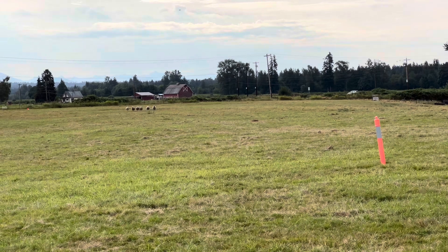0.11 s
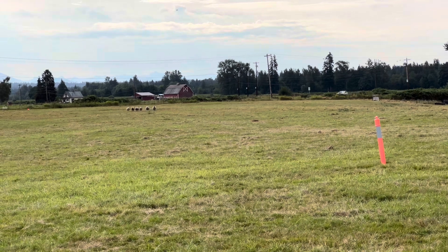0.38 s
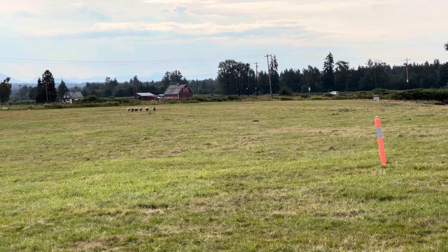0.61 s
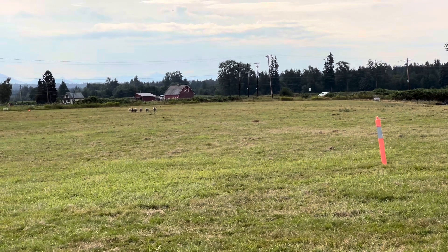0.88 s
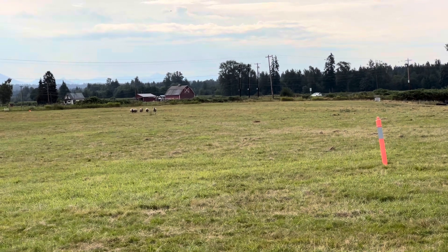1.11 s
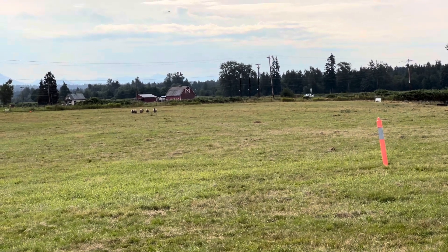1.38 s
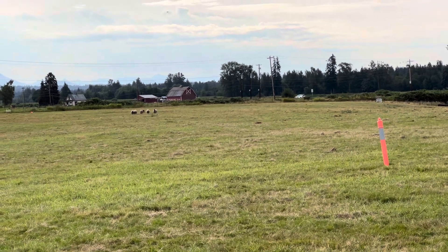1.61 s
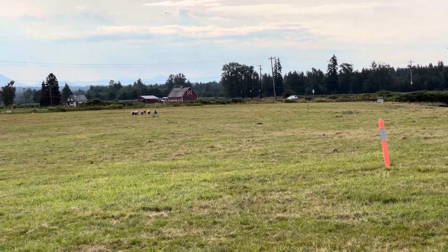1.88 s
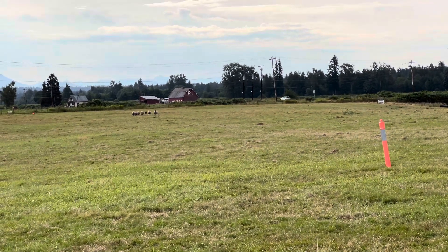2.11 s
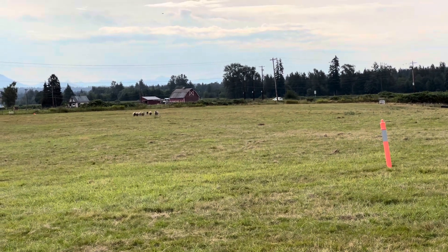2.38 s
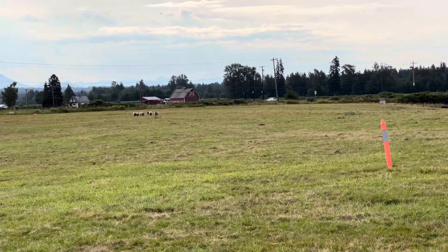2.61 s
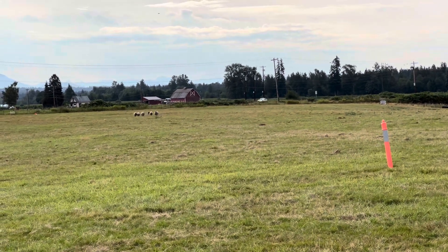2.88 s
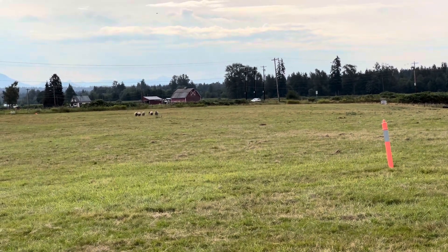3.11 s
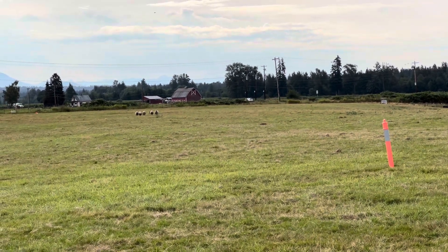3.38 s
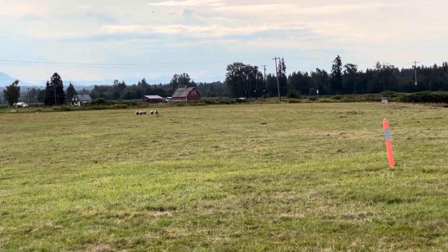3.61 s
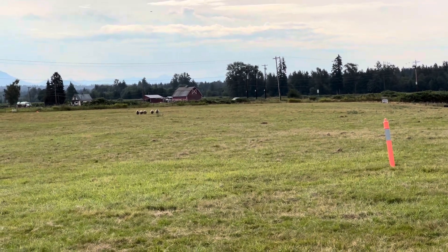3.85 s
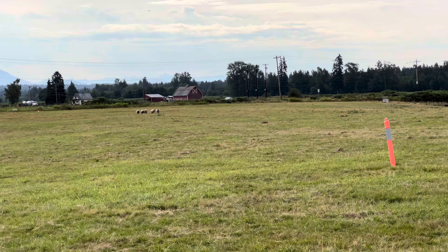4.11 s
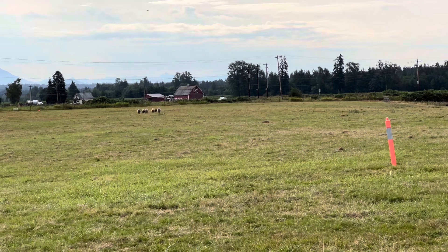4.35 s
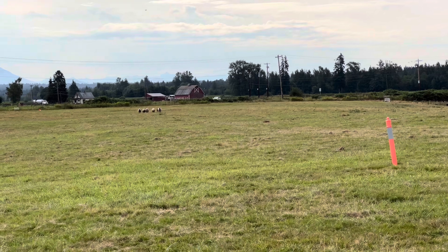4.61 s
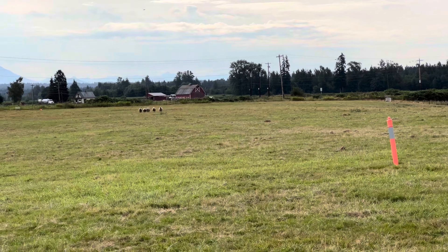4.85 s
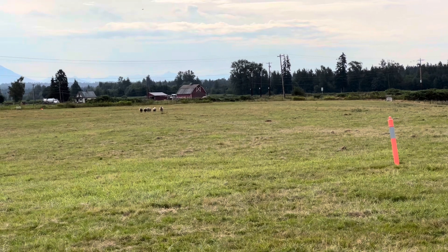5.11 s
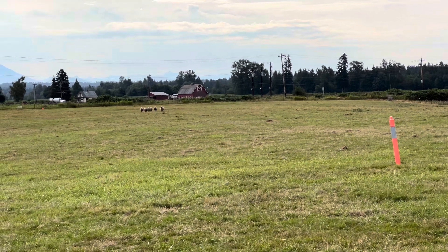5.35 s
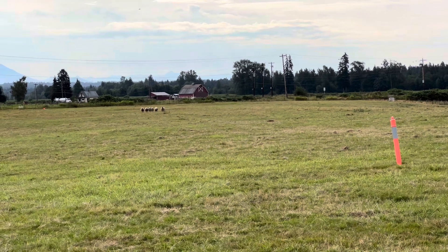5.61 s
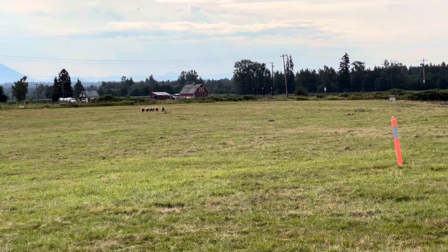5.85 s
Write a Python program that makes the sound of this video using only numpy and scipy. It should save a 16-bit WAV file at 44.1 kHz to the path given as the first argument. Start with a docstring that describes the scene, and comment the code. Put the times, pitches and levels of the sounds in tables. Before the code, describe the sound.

Quiet open grass field with a constant low rumble of far traffic and wavering engine hum. Soft, patchy tyre wash brightens slightly later on. Small distant birds give brief high chips, slides and tiny trills from the start. Two dull, quick knocks come just before three seconds. Wide stereo outdoor pickup, no close sources, faint microphone hiss.

```python
"""Far traffic over an open grass field: band-shaped noise makes a low rumble and a soft, patchy tyre wash.
Idling engines add a few wavering sine hum lines, and short rings make two dull knocks.
Small birds chirp far off as sines on pitch tracks, with a dull scattered echo and a flock heard only as echo.
The microphone pair hisses faintly."""
import sys
import numpy as np
from scipy import signal
from scipy.fft import rfft, irfft
from scipy.io import wavfile
from scipy.ndimage import uniform_filter1d, map_coordinates

SR = 44100
rng = np.random.default_rng(int(sys.argv[2]) if len(sys.argv) > 2 else 0)


def wav_out(sig):
    """Save sig, one row per channel (or a flat mono array), as 16-bit PCM at SR to the path in sys.argv[1]."""
    wavfile.write(sys.argv[1], SR, np.round(np.clip(np.atleast_2d(sig).T, -1, 1) * 32767).astype(np.int16))


def gain_from_db(level_db):
    """Turn a decibel level (scalar or array-like) into a linear amplitude factor."""
    decades = np.asarray(level_db, float) / 20
    return 10 ** decades


N = 263718
FREQS = np.maximum(np.fft.rfftfreq(N, 1 / SR), 1)


def in_time(rows):
    """Draws the columns of a table out to every sample."""
    s, *columns = np.transpose(rows)
    return [np.interp(np.arange(N) / SR, s, c) for c in columns]


def in_pitch(rows):
    """Draws the columns of a table out over log frequency."""
    hz, *columns = np.transpose(rows)
    return [np.interp(np.log(FREQS), np.log(hz), c) for c in columns]


def drift(rate):
    """Smooth chance that wanders through the given number of random knots per s, spread near 1."""
    knots = rng.standard_normal(int(N / SR * 500))
    return map_coordinates(knots, [np.arange(N) / SR * min(rate, 490)], order=3)


def to_pair(near, far):
    """Spectra for both microphones: the right one hears a turned share of the left plus sound of its own."""
    # the microphone pair: [f/Hz, left-right likeness 0-1, right leads/rad, left minus right/dB]
    pair = [(60, .995, 0, 2.0), (130, .97, .05, 2.5), (260, .9, .2, 2.7), (430, .76, .4, 2.9),
            (700, .46, -.1, 2.6), (1050, .5, .15, 1.7), (1450, .62, 1.15, .6), (1950, .72, .6, -.1),
            (2130, .95, .1, -.7), (2550, .97, -.15, -.8), (3300, .95, -.7, -.6), (5000, .97, -.12, 0),
            (7300, .97, 0, 0), (7900, .88, -.45, 0), (8500, .95, 0, 0), (9300, .8, 1.9, 0),
            (10300, .87, 3.1, 0), (11300, .65, 6.2, 0)]
    alike, turn, balance_db = in_pitch(pair)
    alike = np.clip(alike, 0, 1)
    right = alike * near + np.sqrt(1 - alike ** 2) * far
    right = right * np.exp(1j * turn)
    return np.array([near * gain_from_db(balance_db / 2), right * gain_from_db(-balance_db / 2)])


def field_noise(spectrum):
    """Spectra of noise arriving from all around, shaped within the table's band, rms 1 in the left-right mean."""
    inside = (FREQS > spectrum[0][0]) & (FREQS < spectrum[-1][0])
    both = to_pair(*rfft(rng.standard_normal((2, N))))
    both = both * gain_from_db(in_pitch(spectrum)[0]) * inside
    return both / np.std(irfft(both.mean(axis=0), N))


def rumble():
    """Low traffic noise from all around, thinning very slowly."""
    # relative spectrum of the rumble: [f/Hz, level/dB per Hz]
    rumble_spectrum = [(8.8, -42.5), (15, -18.5), (49, -2.5), (70, 0), (114, -8), (135, -10), (193, -24.5),
                       (260, -22.5), (340, -53.5), (570, -120)]
    start_db, slope_db_per_s = -50.5, -0.04
    t = np.arange(N) / SR
    return gain_from_db(start_db + slope_db_per_s * t) * irfft(field_noise(rumble_spectrum), N)


def tyre_wash():
    """Tyre noise in two bands: nearer cars brighten the top, moving air makes both bands patchy."""
    # relative spectrum of the wash before the bands move: [f/Hz, level/dB per Hz]
    wash_spectrum = [(100, -24), (170, -3.5), (210, -9.5), (475, -9.5), (685, -13), (905, -13.5),
                     (1300, -20), (1860, -24), (2300, -30.5), (2700, -35.5), (3200, -43.5), (4200, -47.5),
                     (6000, -59.5)]
    # top of the wash, rising as a car draws nearer, with a brief lift near the knocks: [t/s, level/dB]
    nearing = [(0, -3.5), (.9, -0.5), (1.6, -2), (2.72, -2), (2.85, 2.5), (3.05, 0), (3.6, 0.5), (4.4, 1),
               (5.2, 1), (5.98, 2.5)]
    wash_db = -59.5
    wash = field_noise(wash_spectrum)
    top = 1 / (1 + (1400 / FREQS) ** 4)  # share of the wash above about 1400 Hz
    body = gain_from_db(0.52 * drift(5)) * irfft(wash * (1 - top), N)
    sizzle = gain_from_db(in_time(nearing)[0] + 1.0 * drift(9)) * irfft(wash * top, N)
    return gain_from_db(wash_db) * (body + sizzle)


def engines():
    """Each engine hum line is a sine that wavers a little in pitch and strength on its long path."""
    # hum lines before wavering and panning, each loudest at one moment:
    # [f/Hz, loudest level/dB rms, t/s of the loudest moment, loss/dB per s away from it]
    hum_lines = [(42.8, -58, 6.3, 1), (64.1, -48, 4.72, 2), (77.7, -52.5, 1, 1.5), (89, -59, 6.1, 0.15),
                 (111.36, -58, 4.5, 0.7)]
    pan_db = 2.0  # left minus right
    out, t = np.zeros(N), np.arange(N) / SR
    for hz, peak_db, at, loss_db in hum_lines:
        track_hz = hz + .3 * drift(1.49)
        phase = 2 * np.pi * np.cumsum(track_hz) / SR + rng.uniform(0, 2 * np.pi)
        level_db = peak_db - loss_db * np.abs(t - at) + 1.5 * drift(2.3)
        out += np.sqrt(2) * gain_from_db(level_db) * np.sin(phase)  # root 2: rms to peak
    return out * gain_from_db(np.array([[.5], [-.5]]) * pan_db)


def add_tone(out, start, hz, height):
    """Adds one sine that follows a pitch track."""
    at = round(start * SR)
    out[at:at + len(hz)] += height * np.sin(2 * np.pi * np.cumsum(hz) / SR)


def knocks():
    """Each dull far knock sets a few short, wide, decaying rings going."""
    # rings of one knock: [f/Hz, width/Hz, level/dB]
    knock_modes = [(1520, 170, 0), (2000, 300, -8), (2550, 400, -13)]
    # the knocks: [t/s, level/dB]
    knock_times = [(2.781, -51), (2.862, -46.5)]
    out, t = np.zeros(N), np.arange(round(.02 * SR)) / SR
    for start, knock_db in knock_times:
        for hz, width_hz, mode_db in knock_modes:
            ring = np.exp(-np.pi * width_hz * t) * np.minimum(t / 0.0006, 1)  # 0.6 ms onset
            add_tone(out, start, np.full(len(t), hz), gain_from_db(knock_db + mode_db) * ring)
    return out


def near_birds(waver_hz):
    """All directly heard bird voices; moving air makes far tones flutter in level."""
    voices = whistles(notes(), waver_hz) + chips(waver_hz) + trills(waver_hz) + warble(waver_hz)
    flutter_db = 1.5 * drift(150) + 1.1 * drift(60)
    return voices * gain_from_db(flutter_db)


def notes():
    """Glides, arches and scoops as rows of start, length, first, middle and last pitch, and level."""
    # straight glides: [start t/s, length/s, first f/Hz, last f/Hz, level/dB]
    glide_rows = [(0.042, 0.023, 3900, 4300, -84), (0.075, .009, 4150, 4100, -83),
                  (.05, .014, 8800, 8100, -85), (.07, .02, 8150, 7900, -89), (3.29, .013, 6340, 6300, -84),
                  (0.427, 0.055, 3960, 3500, -82), (.622, .014, 5500, 5100, -85),
                  (0.636, .045, 4140, 3800, -87), (0.658, 0.063, 8450, 8650, -88.5),
                  (0.865, 0.041, 5820, 5620, -75.5), (0.887, 0.0071, 4250, 4200, -77),
                  (0.923, 0.17, 7230, 7120, -88.5), (1.04, .16, 7550, 8000, -89),
                  (1.2, 0.041, 8000, 7500, -87), (1.762, .02, 3570, 3250, -82),
                  (2.17, .063, 4530, 3900, -89), (2.414, .014, 4350, 4440, -82),
                  (2.824, 0.019, 4650, 4350, -78), (0.17, 0.02, 4050, 3850, -88),
                  (1.925, .012, 7750, 7600, -88), (3.15, .047, 6800, 6350, -90),
                  (1.955, .02, 7400, 8100, -88), (1.986, .015, 8700, 8000, -88),
                  (2.014, .012, 7950, 7600, -86), (2.036, .014, 8200, 7600, -86),
                  (2.06, 0.028, 8650, 7600, -86), (2.09, .015, 7950, 7600, -87),
                  (2.116, .015, 8300, 7850, -88), (2.137, .016, 8300, 7750, -87),
                  (2.161, .015, 8150, 7200, -85), (3.02, .05, 4450, 4050, -91),
                  (2.88, 0.028, 6500, 6600, -84), (3.078, .02, 7250, 7320, -86),
                  (3.997, 0.021, 4100, 3520, -83), (4.016, 0.034, 8300, 6800, -85),
                  (4.02, .03, 6000, 5650, -89), (4.628, .028, 4150, 4050, -88),
                  (4.66, 0.025, 4050, 3700, -83), (4.907, 0.013, 5530, 5100, -81.5),
                  (5.138, 0.071, 4470, 3900, -83.5), (5.32, 0.014, 3780, 3360, -79),
                  (1.26, .035, 3900, 3550, -87), (5.6, .15, 4500, 3650, -92),
                  (2.893, .024, 5800, 5800, -90)]
    # arched notes: [start t/s, length/s, first and last f/Hz, crest f/Hz, level/dB]
    arch_rows = [(5.051, .062, 5900, 6120, -82), (2.672, .034, 3900, 3650, -86)]
    # scooped notes: [start t/s, length/s, middle f/Hz, last f/Hz, level/dB]
    scoop_rows = [(0.042, 0.094, 7120, 7300, -87), (0.867, .042, 6120, 6400, -78.5),
                  (1.648, 0.091, 7370, 8900, -83.5), (1.652, .062, 8000, 8500, -89),
                  (2.824, 0.0306, 3270, 3550, -75)]
    scoop_start = 0.08  # scoops start this share above their middle pitch
    glides = [(s, length, first, (first + last) / 2, last, db) for s, length, first, last, db in glide_rows]
    arches = [(s, length, end, crest, end, db) for s, length, end, crest, db in arch_rows]
    scoops = [(s, length, low * (1 + scoop_start), low, last, db) for s, length, low, last, db in scoop_rows]
    return glides + arches + scoops


def whistles(rows, waver_hz):
    """Each note is a sine that bends smoothly through three pitches under a rounded swell."""
    out = np.zeros(N)
    for start, length, first_hz, middle_hz, last_hz, level_db in rows:
        u = np.linspace(0, 1, round(length * SR))
        bend_hz = middle_hz - (first_hz + last_hz) / 2
        hz = first_hz + (last_hz - first_hz) * u + 4 * u * (1 - u) * bend_hz
        hz = hz + waver_hz[round(start * SR):][:len(u)]
        add_tone(out, start, hz, gain_from_db(level_db) * np.sin(np.pi * u) ** .35)
    return out


def chips(waver_hz):
    """Every chip follows the same rounded pitch zigzag, stressed on a different part."""
    # zigzag of one chip, down, up, down: [share of length, f/Hz]
    chip_pitch = [(0, 4050), (.23, 3170), (.58, 4450), (1, 2950)]
    # chips: [start t/s, length/s, share of the full pitch swing,
    #         level/dB at the dip, on the rise, at the crest, on the last fall]
    chip_rows = [(0.682, 0.029, 1.0, -82, -74, -74, -71), (2.809, 0.026, 1.0, -74, -75.5, -79, -95),
                 (3.786, 0.023, 1.07, -66, -69.5, -83, -75), (4.69, 0.029, .55, -67, -68, -82, -72)]
    middle_hz, onset_db = 3720, -6  # the first fall starts 6 dB under the dip
    out, (share, pitch_hz) = np.zeros(N), np.transpose(chip_pitch)
    for start, length, swing, *levels_db in chip_rows:
        u = np.linspace(0, 1, round(length * SR))
        hz = np.interp(u, share, middle_hz + swing * (pitch_hz - middle_hz))
        hz = uniform_filter1d(hz, len(u) // 10, mode="nearest")  # rounds the corners
        hz = hz + waver_hz[round(start * SR):][:len(u)]
        stress_at = [0, share[1], .42, share[2], .82]
        level_db = np.interp(u, stress_at, [levels_db[0] + onset_db, *levels_db])
        add_tone(out, start, hz, gain_from_db(level_db) * np.sin(np.pi * u) ** 0.13)
    return out


def trills(waver_hz):
    """Slightly uneven beats, each dropping in pitch, under a swell."""
    # trills: [start t/s, length/s, f/Hz, drop per beat/Hz, beats per s, lift at the middle/Hz, level/dB]
    trill_rows = [(0.092, 0.083, 8350, 900, 60, 0, -85), (0.096, .06, 4330, 400, 53, 0, -78.5),
                  (5.136, 0.069, 5200, 1100, 131, 330, -72.5), (5.152, 0.075, 3800, 700, 120, 0, -84)]
    spread_db, spread_hz = 1.5, 90  # beats differ in strength and pitch
    out = np.zeros(N)
    for start, length, centre_hz, drop_hz, per_s, lift_hz, level_db in trill_rows:
        u = np.linspace(0, 1, round(length * SR))
        beats = np.cumsum(1 + .03 * drift(66)[:len(u)]) * per_s / SR
        beat = beats % 1  # place within the beat
        louder, higher = rng.standard_normal((2, 40))[:, beats.astype(int)]
        lift = np.exp(-((u - .5) / .22) ** 2)
        hz = centre_hz + lift_hz * lift + spread_hz * higher
        hz = hz + waver_hz[:len(u)] + drop_hz * (.5 - beat)
        swell = np.sin(np.pi * u) ** .6 * np.sin(np.pi * beat) ** 2.8
        add_tone(out, start, hz, gain_from_db(level_db + spread_db * louder) * swell)
    return out


def warble(waver_hz):
    """A held note whose pitch swings evenly up and down, loudest at each dip."""
    # the note: [start t/s, length/s, f/Hz, swing/Hz, dips per s, loss between dips/dB, level/dB]
    warble_note = (3.197, .091, 6160, 120, 66, 6, -76)
    start, length, centre_hz, swing_hz, per_s, loss_db, peak_db = warble_note
    out = np.zeros(N)
    u = np.linspace(0, 1, round(length * SR))
    high = np.cos(2 * np.pi * per_s * length * u)
    hz = centre_hz + swing_hz * high + .5 * waver_hz[:len(u)]
    level_db = peak_db - loss_db * (1 + high) / 2
    add_tone(out, start, hz, gain_from_db(level_db) * np.sin(np.pi * u) ** .3)
    return out


def far_flock():
    """Random short falling chirps, as note rows for whistles()."""
    # flock farther off: [calls per s, lowest f/Hz, highest f/Hz of mid-call pitch, lowest level/dB]
    flock_calls = (26, 2700, 4000, -91.5)
    per_s, low_hz, high_hz, level_db = flock_calls
    chance = rng.random((200, 5))
    start = np.cumsum(-np.log(1 - chance[:, 0])) / per_s  # random gaps
    length = .015 + .05 * chance[:, 2]
    hz = low_hz + (high_hz - low_hz) * chance[:, 1] ** 1.7  # favours low calls
    first_hz = hz * (1 + .15 * chance[:, 3])
    rows = np.c_[start, length, first_hz, hz, hz * .94, level_db + 6 * chance[:, 4]]
    return list(rows[start < N / SR - .1])


def scattered(x):
    """Grass and trees return a short dull blur from all round, modelled as decaying noise."""
    t = np.arange(round(.3 * SR)) / SR
    decay = gain_from_db(-20 * t / .08)  # 20 dB down every 80 ms
    scatter = rng.standard_normal((2, len(t))) * decay * np.minimum(t / .02, 1)  # builds up over 20 ms
    scatter = scatter / np.linalg.norm(scatter[0])
    blur = rfft(signal.fftconvolve([x], scatter, axes=1)[:, :N])
    return to_pair(*blur / (1 + (FREQS / 5500) ** 4))  # dull above 5500 Hz


def hiss():
    """Spectra of the microphone pair's faint hiss: steady shaped noise."""
    # relative spectrum of the hiss: [f/Hz, level/dB per Hz]
    hiss_spectrum = [(2000, -16.5), (3500, -13), (5000, 0.5), (7500, 2), (8500, -0.5), (9500, -2),
                     (10400, -9), (11000, -11.5), (12200, -12.5), (12700, -33.5)]
    return gain_from_db(-90.5) * field_noise(hiss_spectrum)


def scene():
    """Engines, near birds and knocks are direct sources; echoes, road and hiss come from all round."""
    waver_hz = 60.0 * drift(220)  # unsteady voices
    near = near_birds(waver_hz) + knocks()
    flock = whistles(far_flock(), 4.0 * waver_hz)  # heard only as scattered sound
    lag_s = np.array([[0], [7e-6]])  # later on the right
    direct = to_pair(rfft(near), 0) * np.exp(-2j * np.pi * FREQS * lag_s)
    echoes = scattered(gain_from_db(-4) * near + flock)
    return rumble() + tyre_wash() + engines() + irfft(direct + echoes + hiss(), N)


def band_limit(x):
    """A steep low-pass at the top of the band."""
    return signal.sosfilt(signal.butter(12, 12500, fs=SR, output="sos"), x)


def record(dry):
    """Softens both ends over 2 ms so that they do not click, and finishes the mix."""
    n = np.arange(N)
    fade = np.minimum(np.minimum(n, N - 1 - n) / (.002 * SR), 1)
    mix = dry * fade
    return band_limit(mix)


dry = scene()
out = record(dry)
wav_out(out)
```